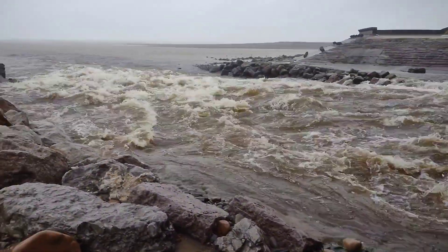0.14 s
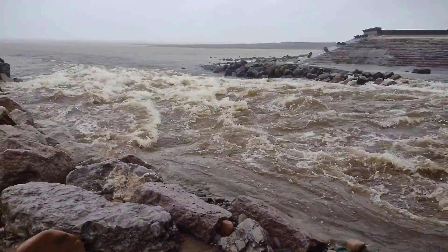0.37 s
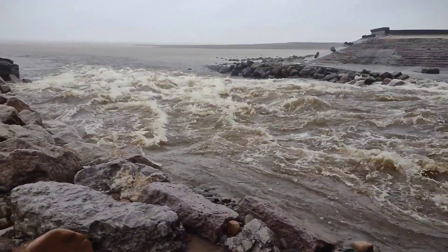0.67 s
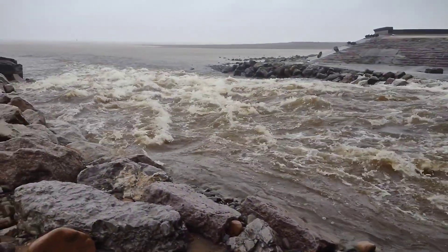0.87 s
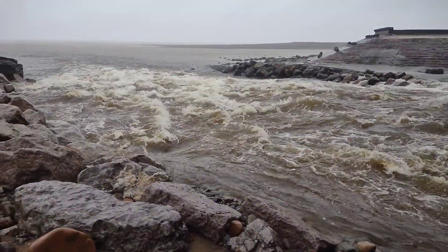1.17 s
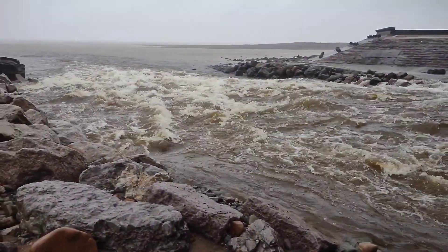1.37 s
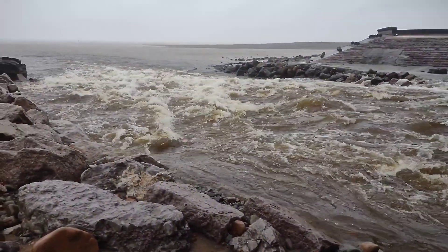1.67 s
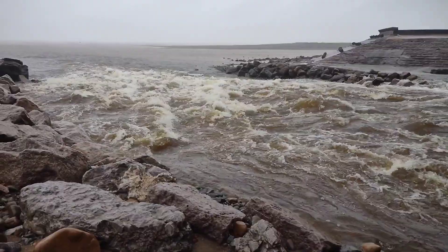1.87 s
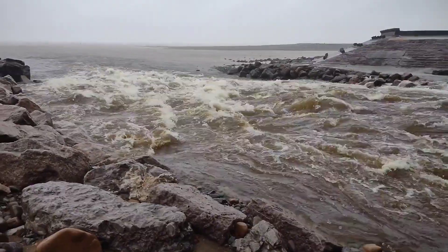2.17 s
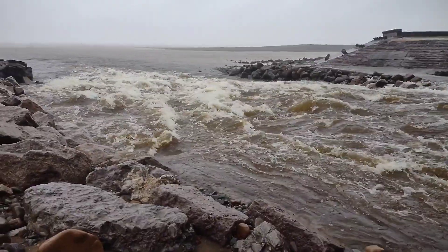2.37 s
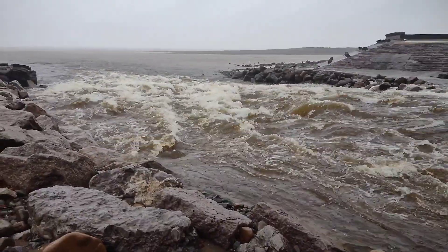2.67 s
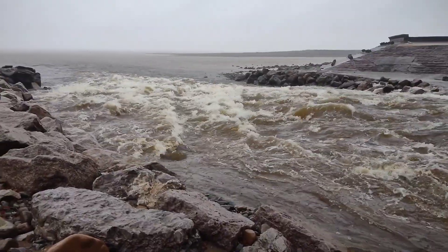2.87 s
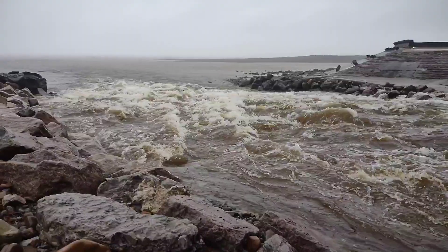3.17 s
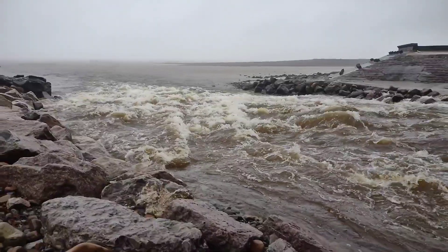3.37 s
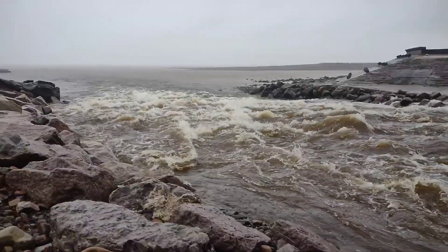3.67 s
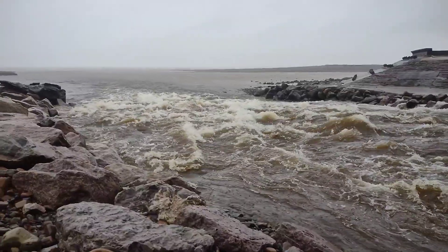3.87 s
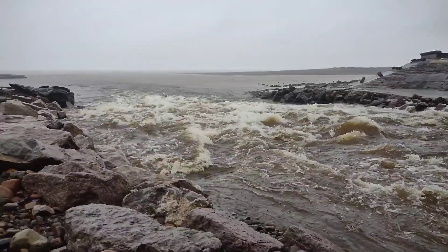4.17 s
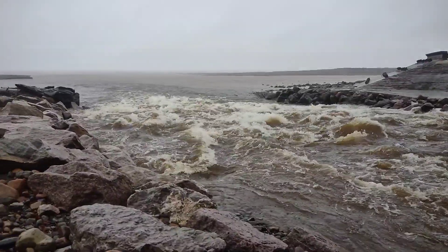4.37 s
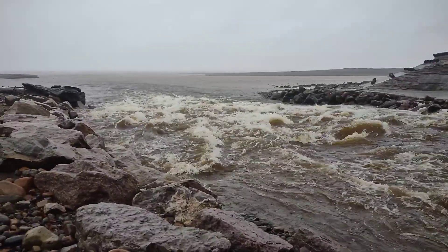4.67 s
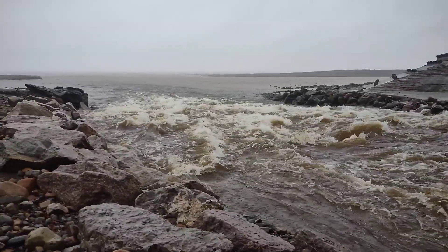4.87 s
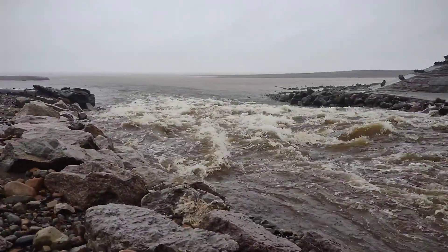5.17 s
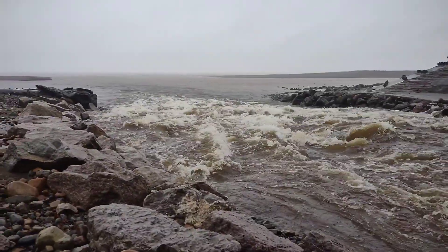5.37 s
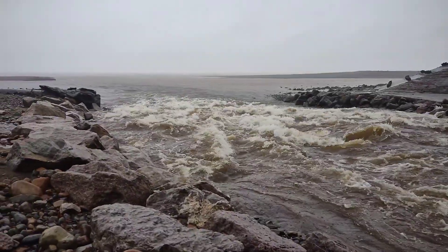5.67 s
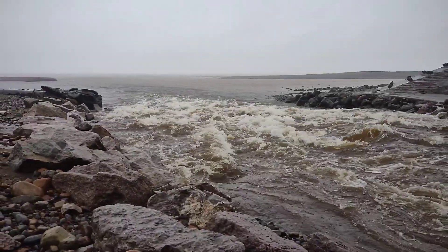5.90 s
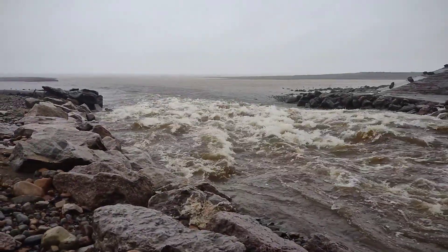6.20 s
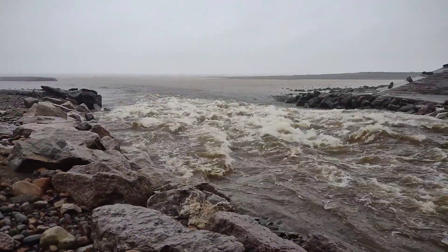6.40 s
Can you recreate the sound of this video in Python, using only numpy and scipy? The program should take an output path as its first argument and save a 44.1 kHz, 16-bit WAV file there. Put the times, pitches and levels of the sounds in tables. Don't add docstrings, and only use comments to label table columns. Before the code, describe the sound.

Continuous white water churns and hisses outdoors, without pauses, over a fluctuating windy rumble. The left microphone is open and detailed; the right sounds covered, dark and quieter. One strong water drop knocks the right microphone early, ducking that side for under half a second. Faint regular digital ticks, wet spray blips and gentle thuds dot the roar. At the very end the water abruptly becomes crisp and wide-band.

```python
import sys
import numpy as np
from scipy import signal
from scipy.fft import rfft, irfft, next_fast_len
from scipy.io import wavfile
from scipy.ndimage import uniform_filter1d, map_coordinates

SR = 44100
rng = np.random.default_rng(int(sys.argv[2]) if len(sys.argv) > 2 else 0)


def how_loud(loudness_db):
    steps = np.asarray(loudness_db, float) / 20
    return 10 ** steps


def dump_mix(stems):
    frames = np.atleast_2d(stems).T
    limited = np.clip(frames, -1, 1)
    pcm = np.round(limited * 32767).astype(np.int16)
    wavfile.write(sys.argv[1], SR, pcm)


N = 288414
CUT_S = 6.4555

# [Hz, dB per Hz]
RUMBLE_SPECTRUM = [(12, -66), (25, -53.5), (45, -48.6), (65, -49), (85, -53), (100, -56)]
# [Hz, dB per Hz]
ROAR_SPECTRUM = [(110, -54), (250, -52), (340, -55.5), (410, -51), (510, -53.5), (570, -50), (720, -61),
                 (960, -65), (1290, -58.5), (1520, -65.5), (1900, -66), (2150, -73.5), (2400, -76.5)]
# [Hz, dB per Hz]
FOAM_SPECTRUM = [(2400, -81), (2650, -73.5), (2900, -84.5), (3150, -87.5), (3700, -77.5), (4500, -74.5),
                 (5100, -81.5), (5450, -84.5), (5800, -94), (6100, -106.6)]
# [Hz, dB per Hz]
COVERED_SPECTRUM = [(105, -61), (160, -58.5), (290, -66), (350, -65), (410, -68), (520, -72), (620, -72.5),
                    (800, -74), (960, -78.5), (1150, -76), (1300, -80.5), (1500, -106.5), (1900, -111.5)]
# [Hz, dB per Hz]
HISS_SPECTRUM = [(1900, -104), (2500, -95), (3050, -100.3), (3500, -95.5), (4700, -96), (5300, -105.5),
                 (5800, -113.8), (6100, -136.0)]
# [Hz, dB per Hz]
NEAR_OPEN_SPECTRUM = [(45, -70), (170, -52.5), (300, -53), (700, -60), (1500, -58.5), (2600, -58),
                      (3100, -68), (3900, -71), (5000, -63.5), (6500, -72), (9500, -81), (12400, -92),
                      (14600, -82), (15600, -85)]
# [Hz, dB per Hz]
NEAR_COVERED_SPECTRUM = [(45, -83), (170, -52.5), (300, -67.5), (700, -65.5), (900, -73), (1250, -78),
                         (1500, -71), (3000, -81), (4800, -77), (5400, -100), (6100, -100.2),
                         (9000, -100.6), (12500, -102.5), (15000, -105.2)]
# [Hz, -1 to 1]
COHERENCE = [(30, 0.82), (65, 1), (120, 0.62), (170, 0.74), (230, 0.25), (300, 0)]
# [Hz, -1 to 1]
NEAR_COHERENCE = [(60, 0.079), (290, .9), (640, 0.76), (1200, 0.35)]
# [s, dB]
WIND_STRENGTH = [(0.0, -32.5), (0.11, -34.5), (0.2, -29), (0.41, -46), (0.63, -34.5), (1.4, -36.5),
                 (1.49, -40.5), (2.08, -31), (2.1, -37.5), (2.87, -30), (2.94, -35), (6.22, -32.5),
                 (6.26, -39), (6.44, -24)]
# [s, 0-1]
CAMERA_SWING = [
    (0, 0),
    (2.0, 0.7),
    (4.0, 0.3),
    (6.0, 0.83),
    (6.45, 1),
]
# [s, dB]
HARD_SLIPS = [(1.8322, -64), (2.8559, -59), (2.9203, -56), (3.0999, -60), (3.1767, -60), (3.3677, -61),
              (3.6117, -59), (4.136, -54), (5.0848, -62), (5.1487, -57), (5.2764, -61), (5.5428, -58),
              (5.6605, -60), (6.1828, -53)]
# [s, dB, Hz]
SPRAY_BURSTS = [
    (0.8799, -34, 3950),
    (2.5651, -34, 4630),
    (2.8314, -35, 4480),
    (3.5952, -36, 4180),
    (4.0444, -40, 3650),
    (4.4024, -38, 4280),
    (5.0923, -34, 4340),
    (5.5518, -31, 4300),
]
# [s, dB, Hz, count, dB]
COVER_DROPS = [
    (1.35, 1, 355, 1.36, -30),
    (1.3525, -17, 120, .9, -60),
    (4.4277, -16, 450, .95, -27),
    (1.948, -24, 420, 1.5, -45),
    (2.090, -34, 300, 1, -45),
    (2.631, -14, 170, 1.6, -50),
    (3.574, -21, 130, 1, -50),
    (3.989, -18, 210, 1, -50),
    (5.636, -17, 160, .9, -50),
]


def along(points, hz):
    f, v = np.transpose(points)
    return np.interp(np.log(hz + 1), np.log(f + 1), v)


def filtered(x, response):
    m = next_fast_len(N + 8192)
    return irfft(rfft(x, m) * response(np.fft.rfftfreq(m, 1 / SR)), m)[..., :N]


def coloured(white, spectrum):
    (f0, db0), (f1, db1) = spectrum[0], spectrum[-1]
    below = [(f0 / 4, -200), (f0 * .88, db0 - 14)]
    above = [(f1 * 1.1, db1 - 18), (f1 * 1.6, -200)]
    closed = [*below, *spectrum, *above]
    return filtered(white, lambda hz: how_loud(along(closed, hz)) * np.sqrt(SR / 2))


def patchy(depth_db, bins=6, frames=12):
    z = signal.stft(rng.standard_normal(N), nperseg=512)[2]
    field = uniform_filter1d(rng.standard_normal(z.shape), bins, 0)
    field = uniform_filter1d(field, frames, 1)
    x = signal.istft(z * how_loud(depth_db * field / field.std()), nperseg=512)[1][:N]
    return x / x.std()


def likeness(first, second, alike):
    def share(hz):
        return np.clip(along(alike, hz), -1, 1)

    return filtered(first, share) + filtered(second, lambda hz: np.sqrt(1 - share(hz) ** 2))


def wobble(rate):
    return map_coordinates(rng.standard_normal(size=200), [np.arange(N) * rate / SR])


def grains(s, size, hz, cycles, glide):
    t = np.arange(500) / SR
    life = t * (hz / cycles)[:, None]
    envelope = size[:, None] * life * np.exp(1 - life)
    wave = envelope * np.sin(2 * np.pi * hz[:, None] * t * (1 + glide * life))
    at = np.round(s * SR).astype(int)[:, None] + np.arange(len(t))
    return np.bincount(at.ravel(), wave.ravel(), N + SR)[:N]


def swarm(count, hz, spread, cycles, scatter_db, glide):
    when, pitch, size = rng.random(count), rng.standard_normal(count), rng.standard_normal(count)
    pitch_hz = hz * np.exp(spread * np.clip(pitch, -2, 2))
    level = how_loud(scatter_db * np.clip(size, -3, 2.5))
    x = grains(when * N / SR, level, pitch_hz, np.full(count, cycles), glide)
    return x / x.std()


def torrent():
    t = np.arange(N) / SR
    wind_db = np.interp(t, *np.transpose(WIND_STRENGTH))
    near = np.interp(t, *np.transpose(CAMERA_SWING))
    near = near - near.mean()
    rumble_gain = how_loud(0.5 + 0.7 * (wind_db - wind_db.mean()))
    heave_db = 0.5 * wobble(6)
    roar_gain = how_loud(2 * near + 0.4 * heave_db)
    splash_gain = how_loud(0.8 * near + 1.1 * heave_db)
    foam_gain = how_loud(2.6 * near + 1.1 * heave_db)

    churn = patchy(0.48)
    behind = likeness(churn, patchy(1.4), COHERENCE)
    bubbles = how_loud(-19) * swarm(count=9000, hz=1117.4, spread=0.444, cycles=3.87, scatter_db=3, glide=0.028)
    foam_bubbles = swarm(count=12000, hz=3934, spread=0.25, cycles=1.5, scatter_db=4.0, glide=0.042)
    foam = patchy(1.0) + how_loud(-14.5) * foam_bubbles
    body = coloured(churn + bubbles, ROAR_SPECTRUM)
    roar = filtered(body, lambda hz: 1 / (1 + (hz / 760) ** 8))
    splash = body - roar
    left = rumble_gain * coloured(churn, RUMBLE_SPECTRUM) + roar_gain * roar
    left += splash_gain * splash + foam_gain * coloured(foam, FOAM_SPECTRUM)

    deep = filtered(behind, lambda hz: how_loud(along([(20, -5), (45, -3), (95, -9)], hz)))
    right = rumble_gain * coloured(deep, RUMBLE_SPECTRUM)
    right += roar_gain ** 0.35 * coloured(behind, COVERED_SPECTRUM)
    return np.array([left, right])


def hiss():
    return coloured(rng.standard_normal(N), HISS_SPECTRUM)


def seams(x):
    first_s, gap_s, slip_gain_db = 0.0423, 0.06398, 14
    at = np.round(np.arange(first_s, CUT_S, gap_s) * SR).astype(int)
    ticks, spurts = np.zeros((2, N))
    ticks[at] = how_loud(-47 + 5 * np.clip(rng.standard_normal(len(at)), -2, 1.6))
    spurts[rng.integers(0, N, size=60)] = how_loud(-66 + 6 * rng.standard_normal(size=60))
    scatter_db = 8 * np.clip(rng.standard_normal((len(at), 2)), -3, 1.2)
    spurts[at] = how_loud(-70.5 + slip_gain_db + scatter_db[:, 0])
    early = at - round(gap_s / 5 * SR)
    spurts[early] = how_loud(-79 + slip_gain_db + scatter_db[:, 1])
    s, db = np.transpose(HARD_SLIPS)
    spurts[np.round((s + 0.001) * SR).astype(int)] = how_loud(db + slip_gain_db)

    lag = abs(np.arange(-900, 901))
    swell = np.exp(-lag / 35) + 0.12 * np.exp(-(lag / 450) ** 2)
    spurts = signal.fftconvolve(spurts, swell, "same") * rng.standard_normal((2, N))
    spurt_band = [(5200, -43.5), (5800, 10.5), (6600, -4.0), (8500, -22.5), (11000, -54.0)]
    tick_band = [(7500, -23.0), (9000, -6), (15000, -5)]
    spurts = filtered(spurts, lambda hz: how_loud(along(spurt_band, hz)))
    ticks = filtered(ticks, lambda hz: how_loud(along(tick_band, hz)))
    return x + (ticks + spurts) * how_loud([[0], [-18]])


def spray():
    s, db, hz = np.transpose(SPRAY_BURSTS)
    late, size, pitch = rng.random((len(s), 3, 4)).transpose(1, 0, 2)
    after_s = s[:, None] + 0.014 * late
    after_level = how_loud(db[:, None] - 2 - 6 * size)
    after_hz = hz[:, None] * (0.85 + 0.3 * pitch)
    after = grains(after_s.ravel(), after_level.ravel(), after_hz.ravel(), np.full(late.size, 2.5), 0.01)
    return grains(s - 0.0005, how_loud(db + 3.5), hz, np.full(len(s), 3), 0.01) + after


def drops():
    out, t = np.zeros(N + SR), np.arange(1500) / SR
    bubble = (t / 0.006) ** 3 * np.exp(3 - 3 * t / 0.006 - (t / 0.008) ** 8)
    bubble *= np.sin(2 * np.pi * 2900 * np.log(1 + 280 * t) / 280)
    tick = t / 0.0004 * np.exp(1 - t / 0.0004) * np.sin(2 * np.pi * 4700 * t)
    for s, db, hz, cycles, bubble_db in COVER_DROPS:
        turns = hz * t / (1 + 32 * t)
        life = turns / cycles / 0.72
        push = life ** 4 * np.exp(4 * (1 - life)) * np.sin(2 * np.pi * (turns - 0.24))
        out[round(s * SR):][:len(t)] += how_loud(db) * push
        out[round((s - 0.0023) * SR):][:len(t)] += how_loud(bubble_db) * bubble + how_loud(db - 42) * tick
    return out[:N]


def limiter(x):
    trip, duck_db, attack_s, hold_s, glide_s = 0.75, -7, 0.0035, 0.405, 0.035
    tripped = np.flatnonzero(abs(x) > trip)[:1] / SR
    t = np.arange(N) / SR - (tripped[0] if len(tripped) else N)
    attack = np.clip(t / attack_s, 0, 1)
    release = np.clip((hold_s + glide_s - t) / glide_s, 0, 1)
    return x * how_loud(duck_db * attack * release)


def near_torrent():
    first = patchy(0.93)
    behind = likeness(first, patchy(1.4), NEAR_COHERENCE)
    return np.array([coloured(first, NEAR_OPEN_SPECTRUM), coloured(behind, NEAR_COVERED_SPECTRUM)])


def scene():
    left, right = torrent()
    right = limiter(right + drops() + hiss())
    first = filtered(np.array([left + spray(), right]), lambda hz: 1 / (1 + (hz / 5800) ** 60))
    from_cut = np.arange(N) / SR - CUT_S
    after = np.clip(from_cut / 0.001 + 0.5, 0, 1)
    leak = how_loud(-17) * np.clip((from_cut + 0.0175) / 0.002, 0, 1)
    return (1 - after) * seams(first) + np.maximum(after, leak) * near_torrent()


def roll_off(x):
    return signal.sosfilt(signal.butter(12, 16170, fs=SR, output="sos"), x)


def record(dry):
    limited = filtered(dry, lambda hz: hz < 15800)
    rounded = np.clip(limited, -0.99, 0.99) + how_loud(-102.5) * rng.standard_normal(dry.shape)
    return roll_off(rounded)


dry = scene()
out = record(dry)
dump_mix(out)
```